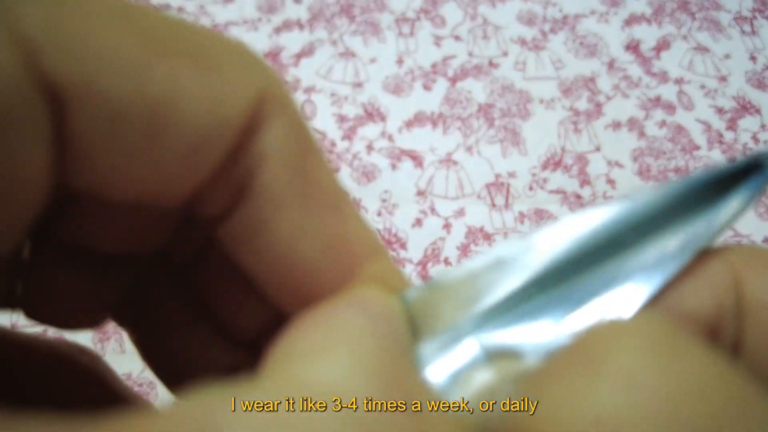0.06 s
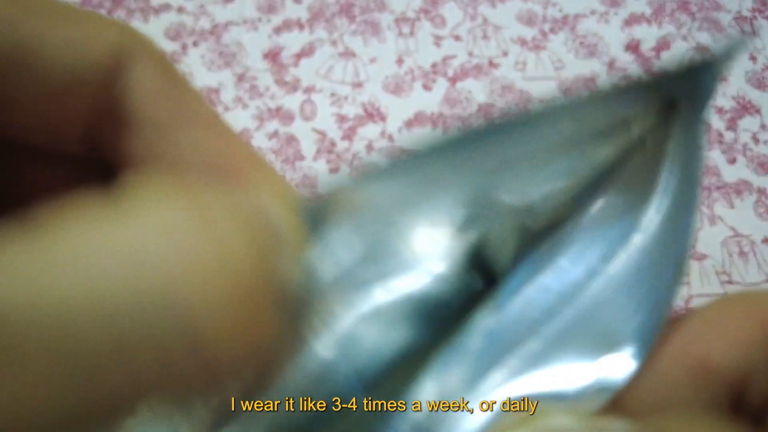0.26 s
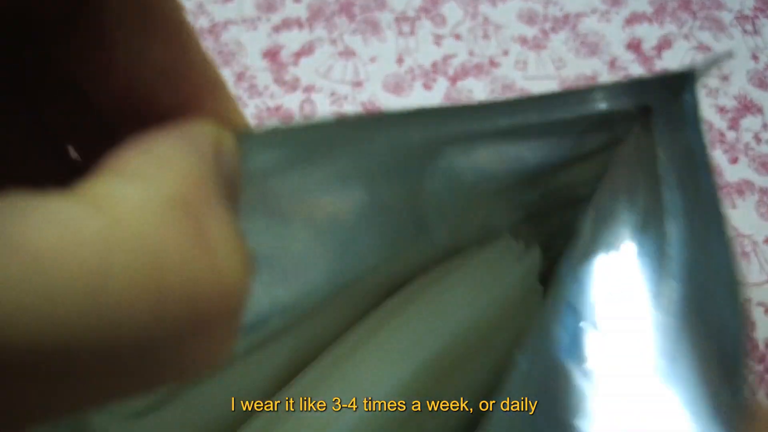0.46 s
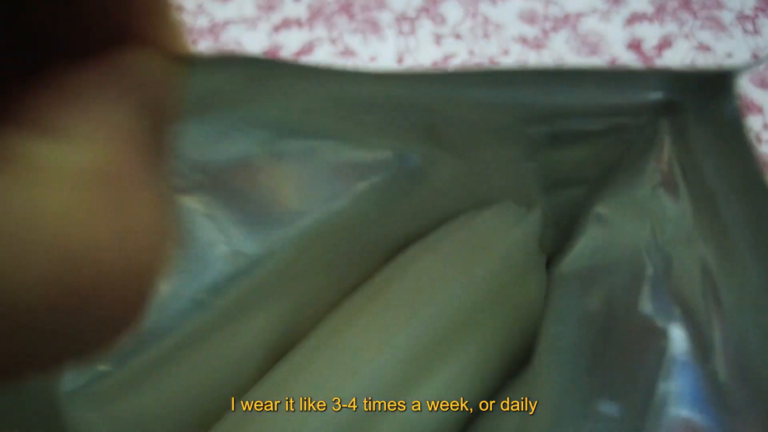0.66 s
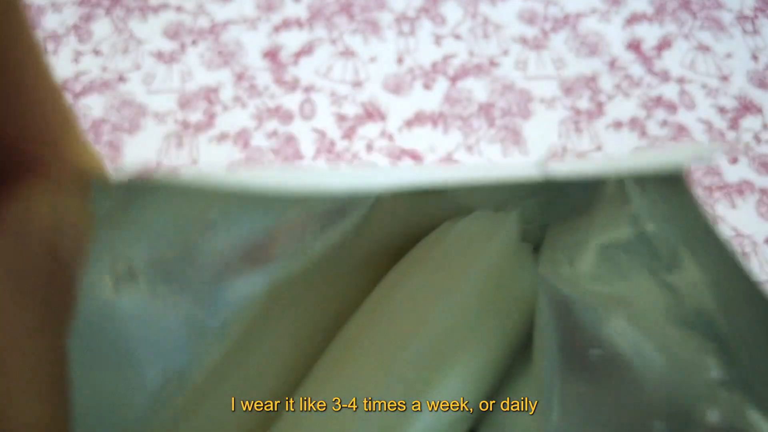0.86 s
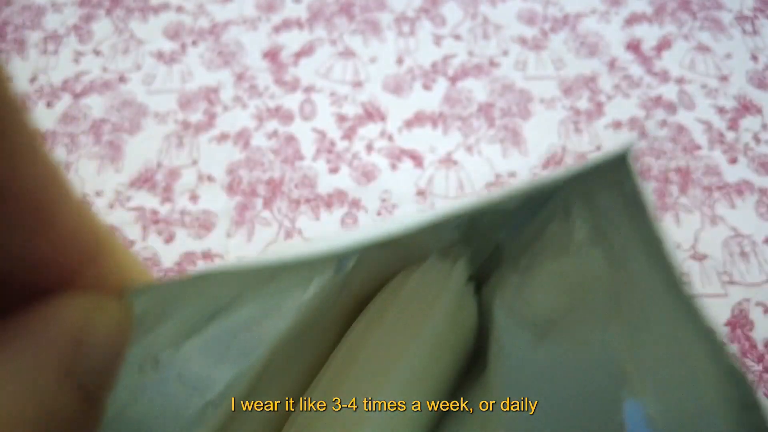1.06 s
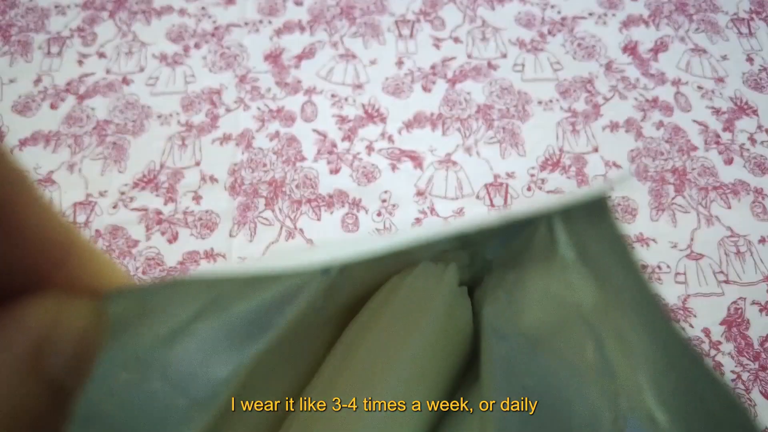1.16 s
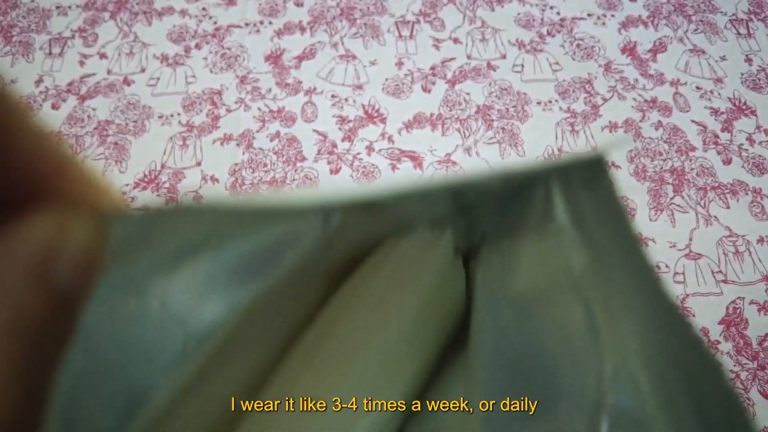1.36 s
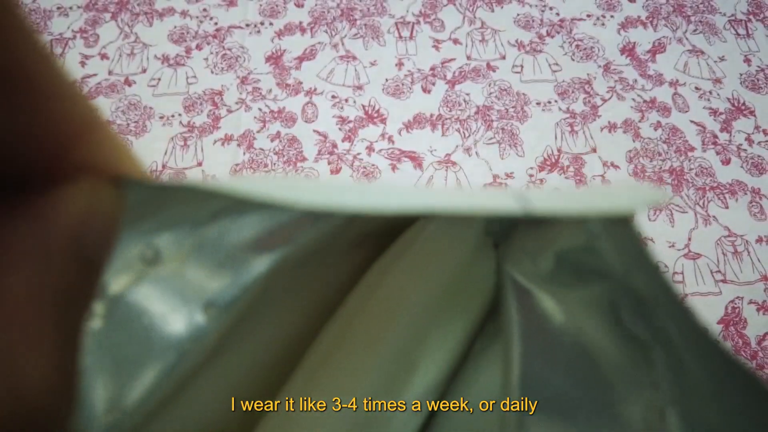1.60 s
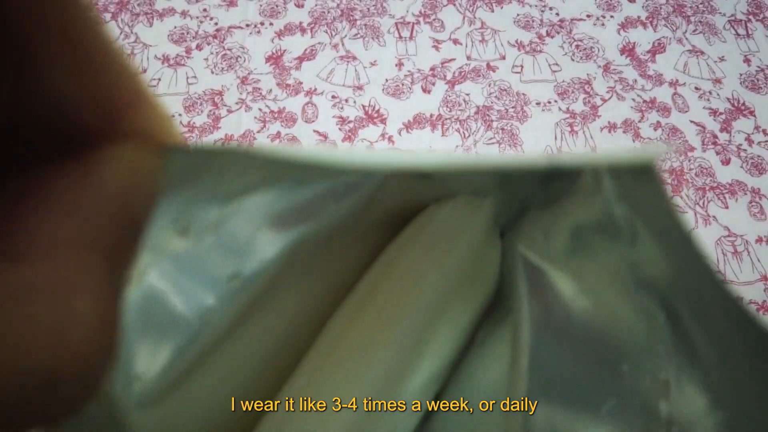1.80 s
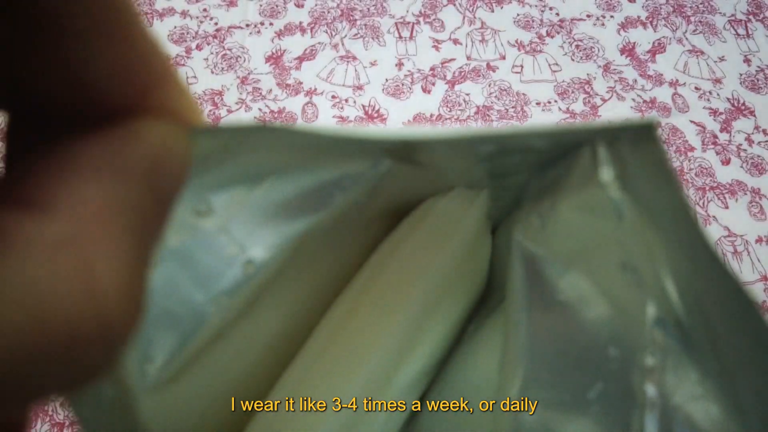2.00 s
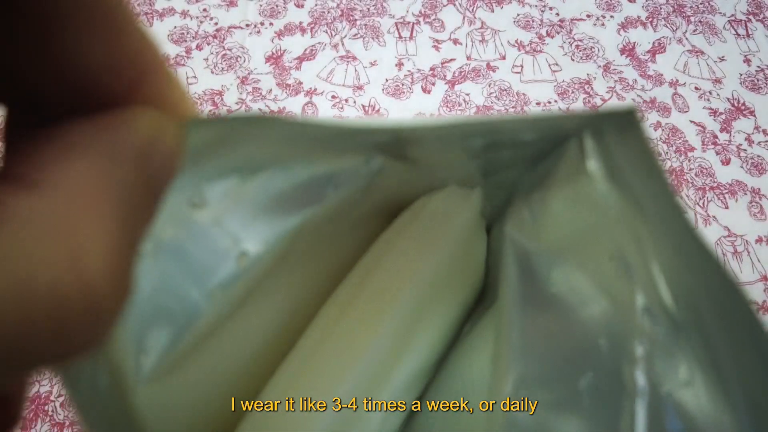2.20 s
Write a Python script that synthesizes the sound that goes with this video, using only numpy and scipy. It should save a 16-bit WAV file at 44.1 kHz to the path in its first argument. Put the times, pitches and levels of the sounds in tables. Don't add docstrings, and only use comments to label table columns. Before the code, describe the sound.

Stiff foil packet crackles and pops loudly as fingers spread it open in a quiet room

```python
import sys
import numpy as np
from scipy import signal
from scipy.fft import rfft, irfft
from scipy.io import wavfile

SR = 44100
rng = np.random.default_rng(int(sys.argv[2]) if len(sys.argv) > 2 else 0)


def digitize_waveform(pressure):
    field = np.atleast_2d(pressure).T
    bounded = np.clip(field, -1, 1)
    quanta = np.round(bounded * 32767).astype(np.int16)
    wavfile.write(sys.argv[1], SR, quanta)


def volts_from_db(level):
    exponent = np.asarray(level, float) / 20
    return 10 ** exponent


N = 99225


def rms_one(x):
    return x / np.sqrt(np.mean(x ** 2) + 1e-20)


def top_one(x):
    return x / np.abs(x).max()


def at_hz(points, hz):
    table_hz, level = np.array(points)[:, 0], np.array(points)[:, 1]
    return np.interp(np.log(hz), np.log(table_hz), level)


def pass_band(x, hz, kind="low"):
    return signal.sosfilt(signal.butter(2, hz, kind, fs=SR, output="sos"), x)


def drift(rate_hz):
    pole = np.exp(-80 * np.pi * rate_hz / SR)
    noise = rng.standard_normal(N // 40 + 2002)
    slow = signal.lfilter([1], [1, -2 * pole, pole * pole], noise)[2000:]
    return np.interp(np.arange(N) / 40, np.arange(len(slow)), rms_one(slow))


def ring(x, hz, cycles):
    r = 10 ** (-3 * hz / (cycles * SR))
    w = 2 * np.pi * hz / SR
    return signal.lfilter([0, np.sin(w)], [1, -2 * r * np.cos(w), r * r], x + 1e-18)


def bands(source, spectrum, patchy_db):
    # (frequency [Hz], correlation [-1..1])
    likeness = [(40, 0.94), (150, 1), (400, 0.2), (1200, 0.35), (3000, 0.74), (8000, 0.65), (14000, -1.3)]
    out = 0
    together = drift(4.0)
    edges = 18 * 2 ** np.arange(0, 10.1, .5)
    for k, (low, high) in enumerate(zip(edges, edges[1:])):
        mid, side = pass_band(source, [low, high], "band")
        hz = np.sqrt(low * high)
        alike = np.clip(at_hz(likeness, hz), -1, 1)
        flicker_db = patchy_db * (together + drift(8.4))
        gain = volts_from_db(at_hz(spectrum, hz) + flicker_db) * (-1) ** k
        out = out + gain * (np.sqrt(1 + alike) * mid + np.sqrt(1 - alike) * side * [[1], [-1]])
    return out


def creases():
    # (time [s], peak level [dB], panel [Hz], film [Hz], film against panel [dB])
    snaps = [(.2025, -12.5, 684, 12500, -1.5), (.2118, -23, 1490, 7840, -13.5),
             (.2088, -18, 1200, 10000, 2.5), (.2325, -1, 1361, 4330, 11), (.2472, -17, 993, 3000, -8.5),
             (.4338, -13.5, 910, 2820, -4.5), (.4575, -6, 1110, 3300, 1.5), (.5072, -2.5, 1610, 4460, -2.5),
             (.5572, -0.5, 1140, 6980, -1.5), (.7005, -17.5, 2000, 7300, -2),
             (.7035, -5.5, 1253, 5750, -3.5), (.7042, -4, 514, 1970, -9), (.7658, -13.5, 1080, 2800, -17.5),
             (.9618, -8, 1740, 4600, -9.5), (1.4535, -20, 694, 4960, 3), (1.454, -16, 2000, 1370, -8.5)]
    # (time [s], peak level [dB], panel [Hz], film against panel [dB])
    ticks = [(.045, -37.5, 740, -6), (0.083, -32.5, 1500, -4), (0.106, -32.5, 1500, -12),
             (0.1245, -32, 1400, -8), (0.172, -31.5, 1040, -6), (0.185, -42.5, 1500, -16),
             (.966, -15, 1810, -14), (0.2788, -20.5, 795, -5), (0.297, -27, 1286, -16),
             (0.354, -35, 700, -20), (0.383, -26, 1960, -20.5), (.2205, -40, 2940, -15.5),
             (0.2525, -29.5, 1020, -6), (0.474, -37, 1750, 0.5), (0.55, -21.5, 700, -23.5),
             (.004, -38.5, 500, -32), (.443, -36, 4000, -19), (0.4943, -34.5, 1800, -21.5),
             (0.736, -53, 420, 15), (0.7928, -21, 960, -71), (0.994, -23, 920, -35),
             (1.15, -41.5, 1140, -14), (1.588, -38, 470, -13), (1.609, -47, 420, -8)]
    # (frequency [Hz], level [dB])
    crack_colour = [(150, -41), (450, -23), (1000, -0.5), (3000, 5), (6000, 2.5), (10000, -5), (16000, -17)]
    side_share = [.12, .35, .85]
    rise_s, buckle_s = .0014, .0011
    ragged_db, ragged_s = -14.5, .006
    slips_per_s, slip_spread_db = 6200, 4
    panel_hears = .3
    panel_t60_s, film_cycles, crack_db = .009, 17.7, -1.5

    size = 2048
    out = np.zeros((2, N + size))
    t = np.arange(size) / SR
    lead = int(rise_s * SR)
    colour = volts_from_db(at_hz(crack_colour, np.maximum(np.fft.rfftfreq(size, 1 / SR), 30)))
    decay = np.exp((rise_s - t) / buckle_s) + volts_from_db(ragged_db) * np.exp(-t / ragged_s)
    shape = np.minimum((t / rise_s) ** 2, decay)
    small = [(s, db, hz, 1.56 * hz + 2000, film_db) for s, db, hz, film_db in ticks]
    for s, db, panel_hz, film_hz, film_db in list(snaps) + small:
        happens = rng.random(size) < slips_per_s / SR
        size_db = slip_spread_db * np.minimum(rng.exponential(1, size), 3)
        sign = np.sign(rng.standard_normal((2, size)))
        slips = happens * volts_from_db(size_db) * shape * sign
        slips[0, lead] = 2 * volts_from_db(slip_spread_db)
        push = slips * np.where(np.arange(size) == lead, 1, panel_hears)

        panel = ring(push, panel_hz, panel_t60_s * panel_hz)
        panel = panel + .2 * ring(slips, .45 * panel_hz, 3.0)
        panel = panel + .12 * ring(slips, 1.6 * panel_hz, 8.0)
        panel = pass_band(panel, min(2.7 * panel_hz, 15000))
        film = ring(push + .22 * slips, min(film_hz, 15000), film_cycles)
        crack = irfft(rfft(np.roll(slips, 6, axis=1)) * colour)

        pair = 0
        levels_db = (0, film_db, film_db + crack_db)
        for part, level_db, share in zip((panel, film, crack), levels_db, side_share):
            even = part / np.linalg.norm(part, axis=1, keepdims=True)
            pair = pair + volts_from_db(level_db) * even * [[1], [share]]
        mid, side = pair
        side = side - mid * (mid @ side) / (mid @ mid)
        i = int((s - .0004) * SR)
        out[:, i:i + size] += volts_from_db(db) * np.array([mid + side, mid - side]) / np.abs(mid).max()
    return pass_band(out[:, :N] + 1e-18, 380, "high")


def tail(x):
    level_db, t60_s, cut_hz = -24.5, .29, 5100
    hollow_hz, hollow_cycles, hollow_db = 1316, 12, -8
    t = np.arange(SR // 2) / SR
    noise = rng.standard_normal((2, len(t))) + 1.5 * rng.standard_normal(len(t))
    room = rms_one(signal.lfilter(*signal.butter(1, cut_hz, fs=SR), noise))
    hollow = rms_one(ring(noise, hollow_hz, hollow_cycles))
    echo = (room + volts_from_db(hollow_db) * hollow) * volts_from_db(-60 * t / t60_s) * (t > .002)
    echo = echo / np.sqrt(np.sum(echo ** 2) / 2)
    return volts_from_db(level_db) * signal.fftconvolve(x, echo, axes=1)[:, :N]


def puffs():
    # (time [s], peak level [dB], swing [Hz])
    pushes = [(0.201, -48, 42), (.28, -35, 60), (0.387, -28.5, 63), (.458, -29, 94), (0.511, -21.5, 95),
              (0.559, -28.5, 95), (0.634, -31, 240), (0.706, -17, 123), (0.733, -36, 204), (0.771, -62, 59),
              (.855, -42, 211), (0.958, -19, 161.6), (0.991, -29, 108), (1.152, -45.5, 153),
              (1.778, -45.5, 40)]
    out = np.zeros(N)
    for s, db, hz in pushes:
        cycles = np.maximum(np.arange(N) / SR - s, 0) * hz
        swing = np.sin(2 * np.pi * cycles) * cycles * np.exp(-np.log(1000) * cycles / 2.51)
        out -= volts_from_db(db) * top_one(swing)
    return out


def crackles(pull_db):
    folds_per_s, full_rate_db, cycles = 280, -48, 3.7
    rate = folds_per_s * np.minimum(volts_from_db(2 * (pull_db - full_rate_db)), 1)
    happens = rng.random(N) < rate / SR
    folds = happens * volts_from_db(4 * np.minimum(rng.exponential(1, N), 3)) * rng.choice([-1, 1], N)
    patch = rng.integers(0, 12, N)
    lean = rng.uniform(-.4, .4, N)
    sided = folds * (1 + lean * [[1], [-1]])
    out = 0
    for k, hz in enumerate(np.geomspace(250, 3500, 12)):
        out = out + ring(sided * (patch == k), hz, cycles)
    return pass_band(out, 4000)


def hands():
    # (time [s], slide level [dB], pull level [dB])
    moves = [(0, -59, -53.5), (0.188, -59.5, -51), (0.213, -38.5, -34.5), (.33, -49, -48),
             (0.426, -59, -50.5), (.47, -49, -35.5), (.6, -45.5, -47), (.69, -58, -48), (0.732, -47.5, -41),
             (0.922, -73.5, -57), (1.0, -49, -66), (1.19, -58.5, -58.5), (1.245, -63.5, -61.5),
             (1.36, -53, -56.5), (1.67, -57, -58), (1.729, -70, -61), (1.95, -57, -58.5),
             (2.06, -72.5, -58.5)]
    # (frequency [Hz], level [dB])
    slide_colour = [(400, -18), (900, -7), (1500, 3.5), (3000, -3.5), (5000, -7.5), (8000, -12),
                    (12000, -16), (16000, -24.5)]
    # (frequency [Hz], level [dB per Hz])
    flex_colour = [(25, 12.5), (140, 4.5), (250, -4), (400, 6), (650, -15), (1320, -3), (2500, -34),
                   (6000, -52.5)]
    fine_db, fine_follows, fine_hz = -64.5, .9, 10000
    crackle_db = .5

    s, slide_db, pull_db = np.transpose(moves)
    t = np.arange(N) / SR
    slide_db = np.interp(t, s, slide_db)
    pull_db = np.interp(t, s, pull_db)
    slide = rms_one(bands(rng.standard_normal((2, N)), slide_colour, patchy_db=.7))
    flex = rms_one(bands(rng.standard_normal((2, N)), flex_colour, patchy_db=2.2))
    fine = rms_one(pass_band(rng.standard_normal((2, N)), fine_hz, "high"))
    hiss = volts_from_db(slide_db) * slide + volts_from_db(fine_db + fine_follows * (slide_db + 56)) * fine
    return hiss + volts_from_db(pull_db) * (flex + volts_from_db(crackle_db) * crackles(pull_db))


def hum():
    # (frequency [Hz], level [dB])
    motor = [(102.3, -68), (199.2, -69.5), (312.2, -60), (446.8, -79)]
    # (frequency [Hz], level [dB])
    air_colour = [(20, 0), (107, -0.5), (234, -8), (301, 6.5), (446, -15), (620, -17.5), (1400, -19.5),
                  (3000, -28.5), (16000, -51.5)][1:]
    waver_db, air_db = 1.5, -61.5
    t = np.arange(N) / SR
    tones = 0
    for hz, db in motor:
        level = volts_from_db(db + 3 + waver_db * drift(4.0))
        tones = tones + level * np.sin(2 * np.pi * hz * t + 1.1 * drift(9.6))
    air = rms_one(bands(rng.standard_normal((2, N)), air_colour, patchy_db=.7))
    return tones + volts_from_db(air_db) * air


def scene():
    foil = creases()
    return foil + tail(foil) + puffs() * [[1], [.9]] + hands() + hum()


def low_pass(x):
    return signal.sosfilt(signal.butter(12, 16810, fs=SR, output="sos"), x)


def record(dry):
    headroom, top_hz = .95, 16700
    soft = headroom * np.tanh(dry / headroom)
    mix = signal.sosfilt(signal.cheby2(12, 60, top_hz, fs=SR, output="sos"), soft)
    return low_pass(mix)


dry = scene()
out = record(dry)
digitize_waveform(out)
```